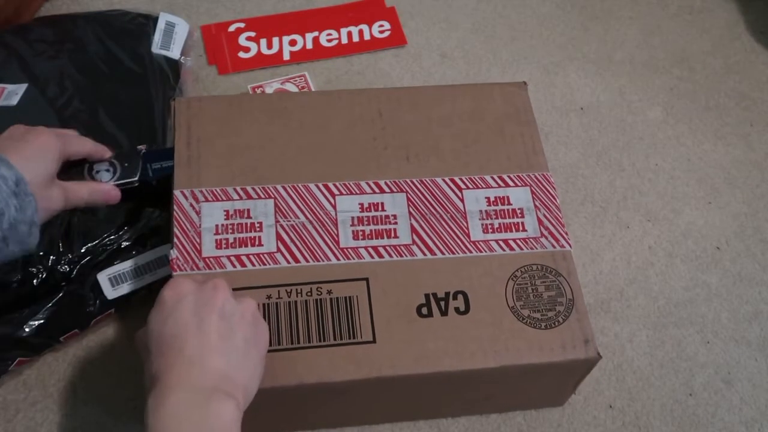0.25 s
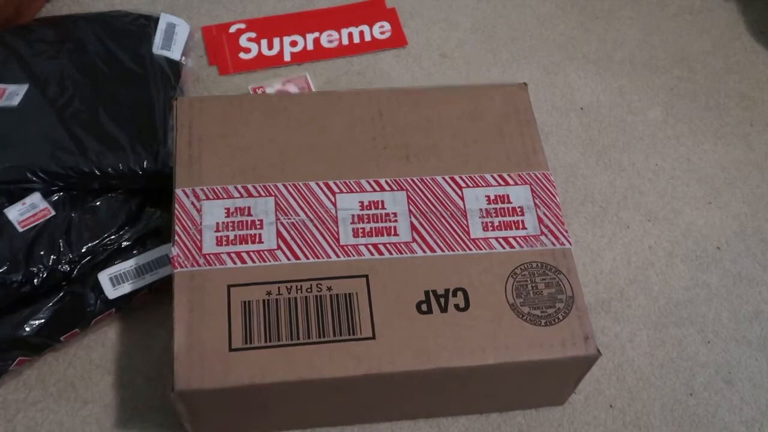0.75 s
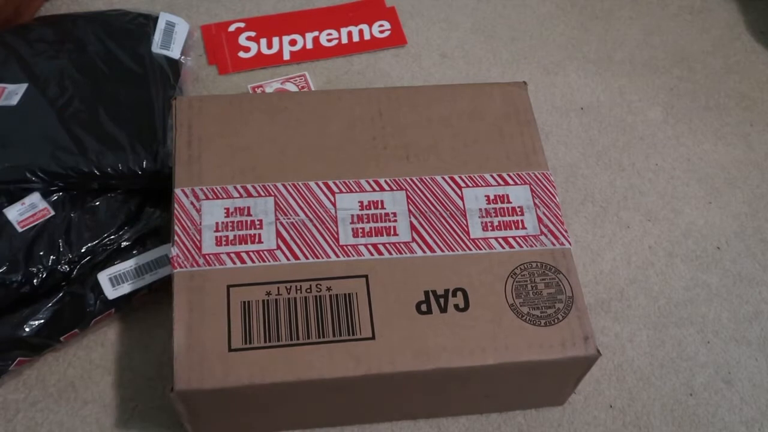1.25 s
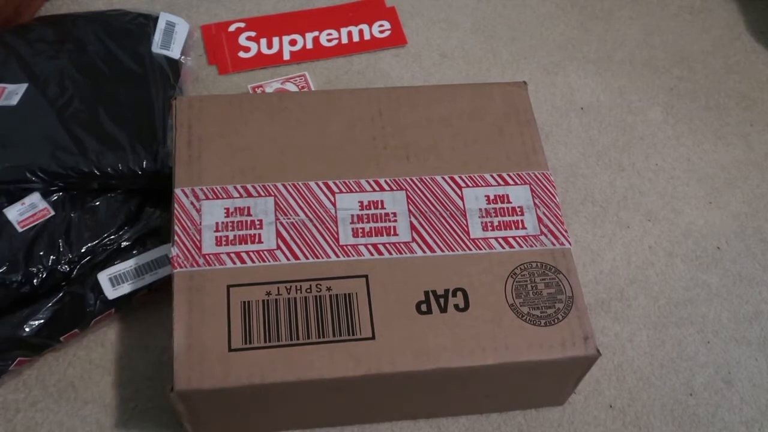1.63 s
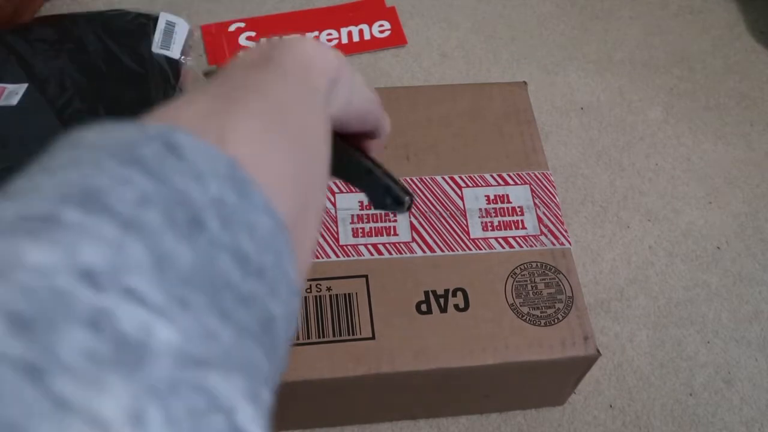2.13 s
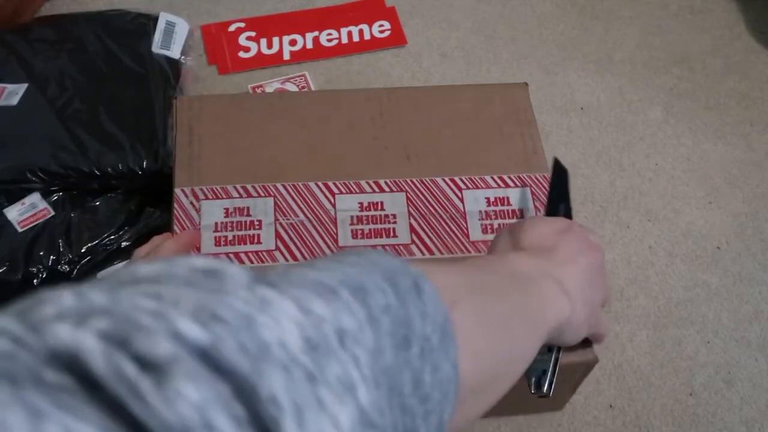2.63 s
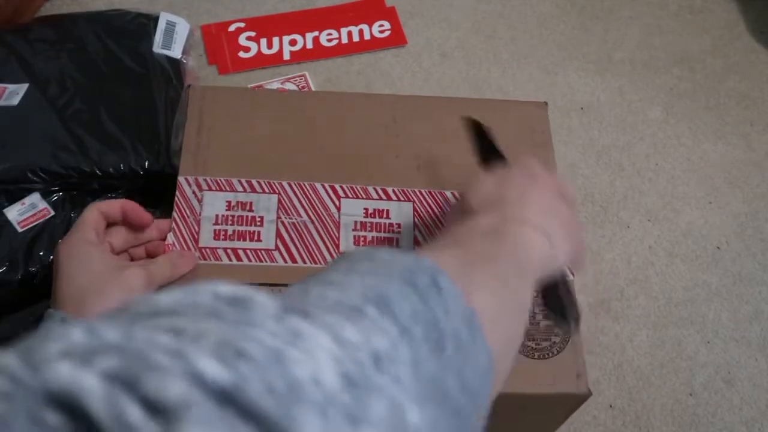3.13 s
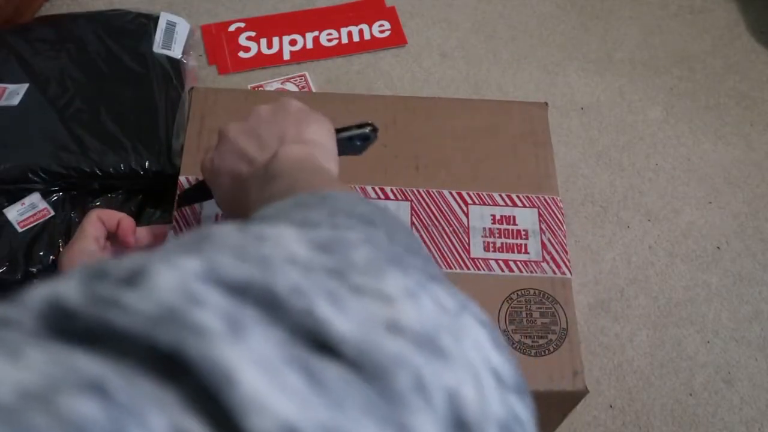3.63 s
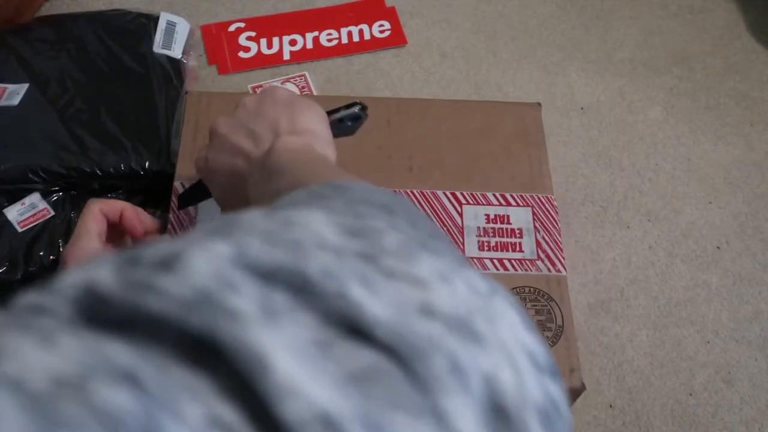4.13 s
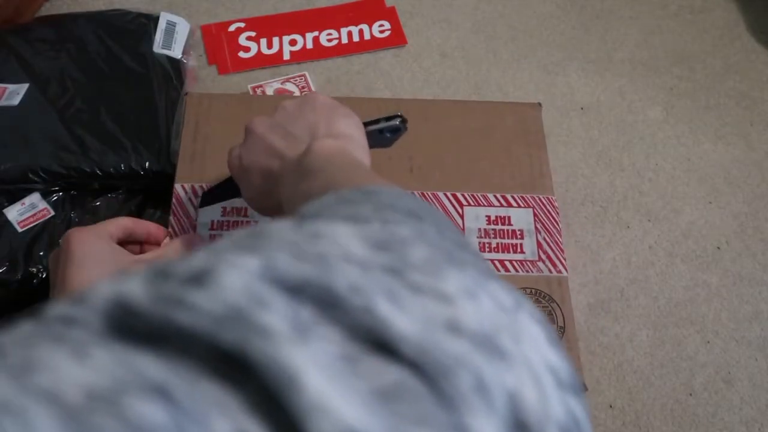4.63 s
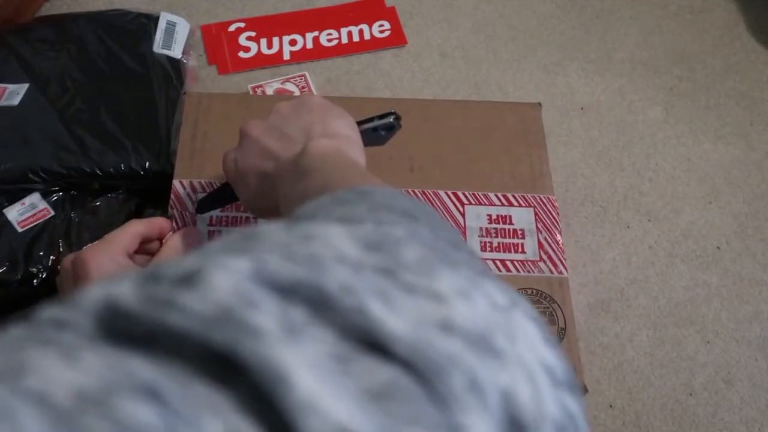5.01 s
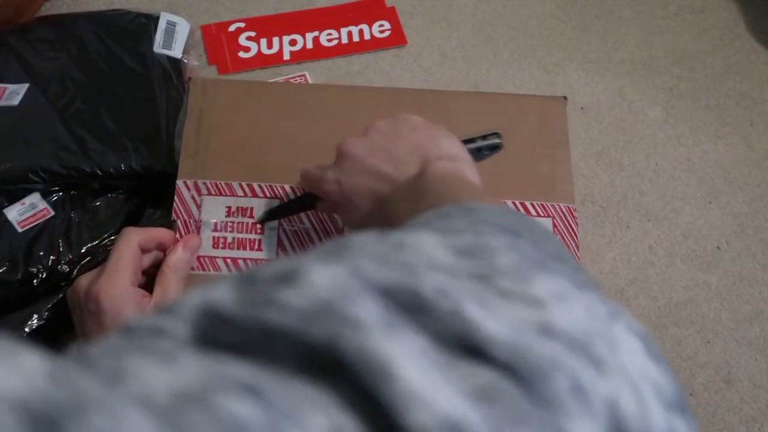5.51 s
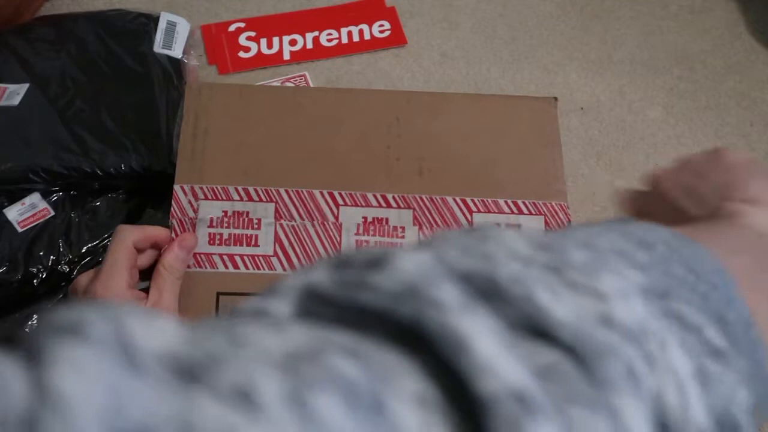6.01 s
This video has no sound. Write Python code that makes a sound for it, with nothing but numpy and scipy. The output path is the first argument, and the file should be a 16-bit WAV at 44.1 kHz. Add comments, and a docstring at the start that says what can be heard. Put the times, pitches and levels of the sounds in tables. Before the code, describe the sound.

A quiet small room with faint low rumble and light microphone hiss, heard close up. From 0 to 0.6 s a hand hisses softly over cardboard, with tiny dry scrapes and a light knock. At about 0.77 s the box drops back on carpet with a dull, crunchy low thud. Near silence follows, with faint ticks at 1.5 and 1.6 s. Around 1.9 s a sleeve swishes; at 2.3 s a knife point taps the lid. Cloth rubs and card scrapes softly from 2.4 to 3.1 s, with a brighter scrape near 2.9 s, then small pushes. At 3.93 to 4.15 s the blade punctures the tape with sharp hollow knocks and crackle. Quieter knocks and low dragging continue until 5.3 s, then crackling, ripping strokes grow over the hollow box, ending in a hard tearing snap at 6.04 s, then quiet.

```python
"""A hand hisses over a cardboard box on a carpet, over the faint rumble of a small room, close to a camera.
The hand lets the box drop back with a thud. A knife is picked up, its point taps the lid, it punctures the
packing tape and is drawn along the seam in crackling strokes until it snaps out at the far edge.
Touches ring the hollow box as fading sine tones with bursts of noise; sliding, scraping, cutting and cloth
weave are filtered showers of tiny random slips; air, swishes and lid rubbing are filtered noise."""
import sys
import numpy as np
from scipy import signal
from scipy.fft import rfft, irfft, next_fast_len
from scipy.io import wavfile
from scipy.ndimage import uniform_filter1d, map_coordinates

SR = 44100
rng = np.random.default_rng(int(sys.argv[2]) if len(sys.argv) > 2 else 0)


def int16_out(signal):
    """Quantize to a 16-bit WAV file."""
    q = np.round(np.clip(np.atleast_2d(signal).T, -1, 1) * 32767)
    wavfile.write(sys.argv[1], SR, q.astype(np.int16))


N = 275933  # length of the scene [samples]


def amp(db):
    """Turn decibels into a plain gain."""
    return 10 ** (np.asarray(db) / 20)


def unit(x):
    """Scale a sound to an average (rms) level of 1."""
    return x / np.sqrt(np.mean(x ** 2) + 1e-20)


def along(points, hz):
    """Read values between (frequency [Hz], value) points, on a log frequency axis."""
    point_hz, value = np.transpose(points)
    return np.interp(np.log(hz + 1), np.log(point_hz + 1), value)


def wobble(rate):
    """A smooth random curve through `rate` random points a second."""
    points = rng.standard_normal(int(N * rate / SR) + 4)
    return map_coordinates(points, [np.arange(N) * rate / SR])


def coloured(x, spectrum):
    """Filter a sound to a (frequency [Hz], level [dB]) shape, with no sound ahead of its cause."""
    n = x.shape[-1]
    m = 2 * next_fast_len(n // 2 + 4096)
    log_gain = np.log(amp(along(spectrum, np.fft.rfftfreq(m, 1 / SR))))
    # folding the cepstrum onto positive times gives the minimum-phase filter
    cepstrum = irfft(log_gain)
    cepstrum[1:m // 2] *= 2
    cepstrum[m // 2 + 1:] = 0
    response = np.exp(rfft(cepstrum))
    return irfft(rfft(x, m) * response, m)[..., :n]


def noise(spectrum):
    """Steady noise of the given colour, at rms 1."""
    return unit(coloured(rng.standard_normal(N), spectrum))


def slips(rate, spread_db):
    """Surfaces stick and let go: about `rate` tiny clicks a second, at random times and of uneven size."""
    size = amp(spread_db * np.clip(rng.standard_normal(N), -2, 2))
    happens = rng.random(N) < rate / SR
    return unit(happens * size * rng.choice([-1, 1], N))


def ring(modes, t, scatter_db, pitch=1):
    """Fading sine tones, all pushed the same way, a little different in level and pitch at each touch."""
    hz, db, t60 = np.transpose(modes)[:, :, None]
    strength, detune = rng.standard_normal((2, len(modes), 1))
    fading = amp(db + scatter_db * strength - 60 * t / t60)
    tone = np.sin(2 * np.pi * pitch * hz * (1 + 0.0082 * detune) * t)
    return np.sum(fading * tone, 0)


def crest(x, size=220):
    """Scale a blow so that its loudest 5 milliseconds have rms 1."""
    return x / np.sqrt(uniform_filter1d(x ** 2, size, mode="constant").max())


def crack(spectrum, t, t60, contact):
    """A burst of snapping fibres that builds up over the contact time [s], then dies away."""
    swell = (1 - np.exp(-t / contact)) ** 2 * amp(-60 * t / (t60 + 6 * contact))
    snaps = rng.standard_normal(len(t)) ** 3  # cubing gives a few large among many small
    return crest(coloured(snaps * swell, spectrum))


def gesture(rows, attack, release_db_per_s):
    """Gain for each level column: every stroke sets in, swells or fades while it lasts, then dies away."""
    t, total = np.arange(N) / SR, 0
    for start, length, swell_db, *level_db in rows:
        onset = np.sin(np.pi / 2 * np.clip((t - start) / attack, 0, 1)) ** 2
        held_db = swell_db * (np.clip((t - start) / length, 0, 1) - .5)
        let_go_db = release_db_per_s * np.maximum(t - start - length, 0)
        stroke = amp(level_db)[:, None] * onset * amp(held_db - let_go_db)
        total = np.maximum(total, stroke)  # where strokes overlap, the stronger one counts
    return total


def add(out, s, sound):
    """Mix a sound in at time s [s]."""
    out[round(s * SR):][:len(sound)] += sound


# how the low rumble of the room rises and falls: (time [s], relative level [dB])
RUMBLE_LEVEL = [(0, -52.5), (1.7, -49), (2.4, -41.5), (3.3, -40), (3.9, -41), (4.8, -46.5), (5.8, -43.5),
                (6.05, -42.5), (6.26, -53.5)]
# colour of that rumble, and of steady, dull room noise: (frequency [Hz], level [dB])
RUMBLE_COLOUR = [(20, -16), (45, -27), (60, -15), (78, 0), (112, 2.5), (140, -10.5), (200, -12.5),
                 (300, -65)]
ROOM_NOISE_COLOUR = [(15, -5), (45, 1), (65, 9.5), (110, -2), (250, -10.5), (300, -6), (340, -1.5),
                     (380, -20.5), (500, -29), (1000, -79)]
# colour of the microphone hiss, and of the low noise at each port: (frequency [Hz], level [dB])
HISS_COLOUR = [(60, -38), (150, -28), (330, -9), (500, -16.5), (1000, -11), (2000, -14), (4400, -20),
               (7300, -25), (12500, -31.5), (13800, -32), (15500, -84)]
PORT_NOISE_COLOUR = [(100, -22), (220, -1.5), (380, 0), (600, -5), (1200, -14), (3000, -61)]


def background():
    """Low room rumble over steady, dull room noise; each microphone adds its own hiss and low noise."""
    t = np.arange(N) / SR
    rumble = amp(np.interp(t, *np.transpose(RUMBLE_LEVEL)) + 1.0) * noise(RUMBLE_COLOUR)
    still = amp(-49.0) * noise(ROOM_NOISE_COLOUR)
    hiss = amp(-57) * np.array([noise(HISS_COLOUR), noise(HISS_COLOUR)])
    ports = amp(-56.0) * np.array([noise(PORT_NOISE_COLOUR), noise(PORT_NOISE_COLOUR)])
    return rumble + still + hiss + ports


# how long the reflections take to die away by 60 dB: (frequency [Hz], time [s])
ECHO_TIME = [(120, 0.31), (500, 0.16), (2000, 0.13), (6000, 0.16), (14000, 0.11)]
# how strong the reflections are: (frequency [Hz], level [dB])
ECHO_LEVEL = [(150, -18.5), (500, -10), (1500, -6.5), (6000, -2)]


def room_tail():
    """The walls' answer to a click: a burst of noise in which each frequency dies at its own speed."""
    hz, t, z = signal.stft(rng.standard_normal(SR // 3), SR, nperseg=256)
    t60 = along(ECHO_TIME, hz)[:, None]
    fading = amp(along(ECHO_LEVEL, hz)[:, None] - 60 * t / t60)
    even_energy = np.sqrt(2 * np.log(1000) / (t60 * SR))  # a longer tail is not a louder one
    tail = signal.istft(z * fading * even_energy, SR, nperseg=256)[1]
    return np.pad(tail, (round(.003 * SR), 0))  # the first reflection comes 3 ms late


def room(x, count=32):
    """Room reflections: evenly spaced random tails fade slowly into one another."""
    knots = np.linspace(0, N, count)
    out = np.zeros(N)
    for share in np.eye(count):
        fade = np.sqrt(np.interp(np.arange(N), knots, share))
        out += signal.oaconvolve(x * fade, room_tail())[:N]
    return out


# the sleeve swishes as the arm swings across:
# (start [s], length [s], swell [dB], level [dB], centre frequency [Hz])
ARM_SWINGS = [(1.91, 0.25, -8, -57.5, 1480), (3.147, 0.2, -2, -60, 2100)]
SLEEVE_RELEASE_DB_PER_S = 192


def swishes():
    """Cloth slides over cloth in a soft band of noise, higher for a quicker swing."""
    out = np.zeros(N)
    for *stroke, hz in ARM_SWINGS:
        swing, = gesture([stroke], attack=0.06, release_db_per_s=SLEEVE_RELEASE_DB_PER_S)
        out += swing * noise([(hz / 8, -50), (hz * 0.68, -9), (hz, 0), (hz * 1.56, -24), (hz * 4, -50)])
    return out


# the hand slides over the card: (start [s], length [s], swell [dB], relative level [dB])
HAND_SLIDES = [(-.05, 0.15, 5, -51.5), (.245, 0.096, 8, -47.5), (.29, 0.16, -0.5, -45.5),
               (.495, 0.068, -6, -47)]
# the sleeve brushes the lid as the arm reaches over:
# (start [s], length [s], swell [dB], relative rub level [dB], relative swish level [dB])
SLEEVE_BRUSHES = [(2.0, 2.1, -4.5, -57, -73), (2.41, 0.057, 8.5, -51, -63), (2.58, 0.23, -3, -53, -59.5),
                  (2.84, 0.18, -4.5, -46, -57), (3.05, 0.079, -1, -56, -54)]
# colours of skin on card, of cloth, and of anything dragged over the box: (frequency [Hz], level [dB])
SKIN_COLOUR = [(60, -17), (120, 2.5), (220, 0), (280, -7.5), (460, -7), (560, -15), (1000, -18),
               (1300, -18), (2200, -20), (5900, -23.5), (6550, -18), (7500, -19), (8500, -24.5),
               (14000, -34), (15500, -56)]
CLOTH_COLOUR = [(410, -23.5), (700, 4), (916, -1.5), (1850, -2.5), (2590, -4), (3430, -7), (11900, -17.5),
                (15000, -49)]
DRAG_COLOUR = [(40, -27.5), (100, -6), (165, 7), (215, -2), (290, -15), (405, -5), (440, -7), (490, -2.5),
               (600, -14), (750, -19), (1100, -25), (2500, -57.5)]


def handling():
    """Skin hisses over the card in tiny slips; later the sleeve's weave slips and its rub adds low noise."""
    slide, = gesture(HAND_SLIDES, attack=0.039, release_db_per_s=360)
    rub, swish = gesture(SLEEVE_BRUSHES, attack=0.0082, release_db_per_s=SLEEVE_RELEASE_DB_PER_S)
    flutter = amp(1.2 * wobble(130))
    skin = unit(coloured(slips(rate=1700, spread_db=1.0), SKIN_COLOUR))
    hand = amp(4.5) * flutter * slide * skin
    weave = unit(coloured(slips(rate=1100, spread_db=2.5), CLOTH_COLOUR))
    cloth = amp(2.5) * swish * weave
    rubbing = amp(3.0) * rub * noise(DRAG_COLOUR)
    folds = amp(1.8 * wobble(26))
    return hand + folds * (cloth + rubbing)


# short scrapes over the card: (start [s], length [s], swell [dB],
# judder of the panel [dB], chatter of the card [dB], scratch of its surface [dB])
SHORT_SCRAPES = [(0, 0.011, -12, -55, -47, -51), (0.1, 0.012, -1, -56, -48.5, -66),
                 (0.572, 0.013, -24, -35, -45, -43.5), (2.595, 0.035, 3, -66, -55, -63),
                 (2.70, 0.074, 8, -70, -54, -58.5), (2.882, 0.014, -7, -48, -38.5, -43.5),
                 (3.079, 0.014, 0.5, -32.5, -46, -44), (4.365, 0.028, 3.5, -50.5, -52.5, -65),
                 (4.78, 0.0097, -12, -51, -54, -54), (5.115, 0.028, 0, -46, -56.5, -63),
                 (6.015, 0.054, -3.5, -24.5, -39, -49)]
# colours of these three parts: (frequency [Hz], level [dB])
JUDDER_COLOUR = [(150, -12), (320, -28), (430, -7.5), (500, 4), (570, -11), (750, -22), (1500, -52)]
CHATTER_COLOUR = [(500, -33), (780, -5.5), (1100, -1.5), (1500, -2.5), (2000, -14), (2600, -7.5),
                  (4000, -16), (8000, -40.5)]
SCRATCH_COLOUR = [(1500, -34), (3000, 3), (5500, 1), (6900, 0.5), (8000, -12.5), (12500, -10), (15500, -35)]


def scrapes():
    """A short scrape catches and lets go: the panel judders, the card chatters, its surface scratches."""
    judder, chatter, scratch = gesture(SHORT_SCRAPES, attack=0.0042, release_db_per_s=602)
    catches = slips(rate=520, spread_db=0.5)
    grit = slips(rate=2300, spread_db=18.0)
    panel = judder * unit(coloured(catches, JUDDER_COLOUR))
    card = chatter * unit(coloured(catches, CHATTER_COLOUR))
    surface = scratch * unit(coloured(catches + grit, SCRATCH_COLOUR))
    return panel + card + surface


# the bottom edge meets the floor: (start [s], length [s], swell [dB], level [dB])
EDGE_LANDING = [(0.768, 0.0093, 13, -25.5)]
# colour of the crunching edge: (frequency [Hz], level [dB])
CRUNCH_COLOUR = [(100, -2), (250, 2.5), (420, -7), (555, 6), (700, -10), (872, 1), (1150, -32), (1560, -10),
                 (1800, -15), (2150, -9.5), (2700, -24), (3100, -36), (3500, -28), (6000, -34),
                 (12000, -66)]


def landing():
    """The box's bottom edge crunches down in many small slips, harder as its weight arrives."""
    weight, = gesture(EDGE_LANDING, attack=0.0029, release_db_per_s=758)
    return weight * unit(coloured(slips(rate=1400, spread_db=1.5), CRUNCH_COLOUR))


def jolt(start=0.776):
    """The box drops back, thuds on the floor and shakes the camera, with opposite sign at its two ports."""
    t = np.maximum(np.arange(N) / SR - start, 0)
    press = 1 - np.exp(-t / 0.0012)
    floor_modes = [(55, -6, 0.1), (96, 4, 0.13)]  # (frequency [Hz], level [dB], time to fade by 60 dB [s])
    thud = amp(-21) * crest(ring(floor_modes, t, scatter_db=2) * press)
    shaking = noise([(40, -30), (110, -3), (220, -2), (500, -9), (1000, -17), (3000, -34)])
    shake = amp(-22.5) * shaking * press * amp(-60 * t / 0.079)
    return np.array([thud + shake, thud - shake])


# colours of the knife's handle, and of its point on the lid: (frequency [Hz], level [dB])
HANDLE_COLOUR = [(400, -10), (1000, -10), (1750, -8), (2020, -1), (2480, -1), (2650, -22), (4800, -27),
                 (7000, -50)]
POINT_COLOUR = [(300, -8), (700, 9), (1100, -12), (1620, -2), (1880, -4), (2500, -19), (3100, -8),
                (3700, -28), (7000, -39)]


def knife():
    """The handle clacks softly as it is picked up; later the point is set down on the lid."""
    out, t = np.zeros(N), np.arange(SR // 4) / SR
    add(out, 1.589, amp(-43) * crack(HANDLE_COLOUR, t, t60=0.025, contact=0.001))
    add(out, 2.297, amp(-34) * crack(POINT_COLOUR, t, t60=0.017, contact=0.002))
    return out


# tones of the stiff card: (frequency [Hz], level [dB])
CARD_TONES = [(720, -1.5), (890, -8), (1120, -3.5), (1290, 1), (1430, 4), (1760, -3), (2200, 1.5),
              (2750, 7.5), (3050, 4), (3600, 2), (4040, 7), (4800, 1)]


def card_ring(t, scatter_db):
    """Card is lossy: each of its tones fades by 60 dB within the same 34 cycles."""
    return ring([(hz, db, 34 / hz) for hz, db in CARD_TONES], t, scatter_db)


# tones of the lid: (frequency [Hz], level [dB], time to fade by 60 dB [s])
LID_TONES = [(94, -10.5, 0.11), (132.3, 0.5, 0.083), (154.8, 3, 0.069), (193, -3.5, 0.087),
             (218, -34, 0.021)]
# tones of the panels: (multiple of the knock pitch [ratio], level [dB], time to fade by 60 dB [s])
PANEL_TONES = [(.82, -3.5, 0.13), (1, 12, 0.048), (1.14, -2.5, 0.061), (1.4, -12.5, 0.019),
               (1.76, -15, 0.035)]
# colours of clacking card and ticking tape: (frequency [Hz], level [dB])
CLACK_COLOUR = [(300, -44.5), (800, 2), (2200, -14.5), (4000, -9.5), (6000, -16.5), (12000, -52)]
TICK_COLOUR = [(1000, -22.5), (3500, -0.5), (5500, 4.5), (8000, 1.5), (12500, -4), (14500, -17),
               (16000, -16)]


def blow(mix_db, knock_hz, clack_hz, contact, treble_db=-14):
    """One touch pushes the lid, knocks the panels, clacks the stiff card and ticks the tape."""
    t = np.arange(SR // 4) / SR
    press = 1 - np.exp(-t / contact)
    thump = crest(ring(LID_TONES, t, scatter_db=3.0) * press)
    panels = ring(PANEL_TONES, t, scatter_db=3.0, pitch=knock_hz) * press
    knock = crest(np.gradient(panels))  # the slope favours the higher tones
    fibres = crack(CLACK_COLOUR, t, t60=0.011, contact=contact)
    card = fibres + amp(-7.0) * crest(card_ring(t, scatter_db=5) * press ** 2)
    clack = crest(coloured(card, [(clack_hz / 3, -13), (clack_hz, 0), (clack_hz * 3, treble_db)]))
    tick = crack(TICK_COLOUR, t, t60=0.0046, contact=contact)
    return amp(mix_db) @ np.array([thump, knock, clack, tick])


# soft pushes, under which the lid gives way:
# (time [s], relative level [dB], brightness [dB], panel pitch [Hz], clack pitch [Hz])
SOFT_PUSHES = [(0.785, -15.5, -7, 311, 1230), (2.279, -37.5, 13, 600, 1000), (2.301, -23.5, -5, 474, 1650),
               (2.601, -33, 7, 387, 1240), (3.603, -26, 2.5, 500, 1270), (3.738, -37.5, 9, 773, 1240),
               (4.002, -11.5, 2, 342, 950), (4.044, -15, 1, 390, 900), (4.066, -24, -2, 486, 1000),
               (4.176, -30, 3, 574, 1000), (4.382, -15.5, 2.5, 344, 1080), (4.53, -33, 4, 513, 900),
               (4.882, -35, 9, 470, 1170), (5.336, -25, -14, 445, 1000), (5.545, -29.5, 0, 456, 1010),
               (5.58, -25.5, 12, 514, 1730), (5.667, -13.5, -2, 437, 1500), (5.68, -11.5, -4, 405, 1500),
               (5.7, -25, -6, 510, 1240), (5.794, -19, 6, 435, 1100), (5.887, -15, 1, 434, 1110)]
# firm knocks of hand and knife:
# (time [s], relative level [dB], brightness [dB], panel pitch [Hz], contact time [s])
FIRM_KNOCKS = [(.516, -39.5, -5, 468, 0.0028), (.57, -31.5, -0.5, 472, 0.0016),
               (.767, -44, 13, 645, 0.00051), (.777, -26.5, -0.5, 520, 0.0014),
               (2.888, -32, 4, 466, 0.0037), (2.968, -39, -5, 464, 0.0012), (3.079, -26, -7.5, 506, 0.008),
               (3.928, -12, -6, 513, 0.00085), (3.984, -20, -0.5, 702, 0.0043),
               (4.038, -10.5, -0.5, 528, 0.00085), (4.294, -45, -1, 617, 0.00071),
               (4.487, -30.5, -8, 498, 0.002), (4.575, -18.5, -5, 499, 0.0032)]
# shares of a push and of a knock: (lid thump [dB], panel knock [dB], card clack [dB], tape tick [dB])
PUSH_SHARES = (0, -10.5, -23, -51)
KNOCK_SHARES = (-2.5, -0.5, -7, -18.5)
# the taut tape snaps and jerks the card and the lid: (time [s], tape [dB], card [dB], lid [dB])
TAPE_SNAPS = [(1.486, -53.5, -59, -40.5), (2.757, -49.5, -43, -37), (3.067, -46, -40, -55),
              (3.925, -26.5, -32, -39), (3.935, -26, -22.5, -23), (4.15, -51.5, -60, -57),
              (4.485, -47, -61, -45), (4.867, -55.5, -81, -44), (5.307, -40, -33, -36),
              (5.352, -35.5, -40, -54), (5.453, -55, -55, -54), (5.596, -37.5, -41, -30),
              (5.669, -54, -32, -18), (5.704, -41, -40, -40), (5.763, -42, -45, -48),
              (5.834, -30, -27, -35), (5.855, -44, -48, -43), (5.975, -38, -30.5, -39),
              (6.005, -35, -49, -48), (6.038, -26, -15, -39)]


def blows():
    """Pushes, knocks and snaps ring the same box in different shares; brightness lifts clack and tick."""
    out, treble = np.zeros(N + SR), np.array([0, 0, 1, 1])
    for s, db, bright_db, hz, clack_hz in SOFT_PUSHES:
        mix_db = db + np.array(PUSH_SHARES) + bright_db * treble
        contact = 0.0021 * amp(-bright_db / 2)  # a duller push has a softer, longer contact
        # a soft touch leaves the upper card tones still
        add(out, s, blow(mix_db, hz, clack_hz, contact, treble_db=-33))
    for s, db, bright_db, hz, contact in FIRM_KNOCKS:
        mix_db = db + np.array(KNOCK_SHARES) + bright_db * treble
        add(out, s, blow(mix_db, hz, clack_hz=1670, contact=contact))
    for s, tape_db, card_db, lid_db in TAPE_SNAPS:
        mix_db = [lid_db, card_db - 1, card_db, tape_db]  # the panels knock just below the card
        add(out, s, blow(mix_db, knock_hz=496, clack_hz=2520, contact=0.0019))
    return coloured(out[:N], [(30, -39), (70, -10.0), (125, -1.0)])  # the blows carry little deep bass below 70 Hz


# strokes of the blade: (start [s], length [s], swell over the stroke [dB], drag on the box [dB],
# relative rasp of the tape [dB], relative tearing of the card [dB])
BLADE_STROKES = [(3.93, 0.11, -15, -29, -38.5, -36), (4.045, 0.026, -1, -29.5, -42, -36),
                 (4.115, 0.06, -3, -41, -48, -46), (4.5, 0.77, -8, -50, -60, -67),
                 (4.97, 0.15, 2.5, -37.5, -59.5, -63), (5.17, 0.16, 17, -41, -56.5, -64),
                 (5.295, 0.071, 0.5, -33, -47.5, -48), (5.515, 0.066, 13, -42, -51, -51.5),
                 (5.582, 0.052, 4.5, -30.5, -38.5, -43), (5.667, 0.14, -5.5, -27, -40.5, -41.5),
                 (5.836, 0.061, 2, -37.5, -46, -45), (5.915, 0.11, 11.5, -25.5, -43, -38),
                 (6.0, 0.037, 15, -26.5, -29, -38), (6.038, 0.026, -14, -33, -28, -21)]
# colour of the splitting tape: (frequency [Hz], level [dB])
RASP_COLOUR = [(300, -21), (900, 12), (1350, 18), (1680, 12), (2250, 10), (2750, 8.5), (3200, 8), (4000, 3),
               (4500, 0.5), (8000, -2.5), (12500, -10), (14500, -37), (16000, -65)]


def cutting():
    """The blade catches and slips: coarse slips shake the box, the film crackles, fibres tear in clumps."""
    drag, rasp, tear = gesture(BLADE_STROKES, attack=0.0026, release_db_per_s=353)
    coarse = slips(rate=900, spread_db=1.5)
    clumps = amp(3 * wobble(140))
    fibres = unit(slips(rate=1600, spread_db=4) * clumps)
    splitting = unit(coloured(fibres + 1.17 * coarse, RASP_COLOUR))
    crackles = slips(rate=260, spread_db=3)
    film = amp(-6) * unit(coloured(crackles, TICK_COLOUR))
    card = card_ring(np.arange(SR // 8) / SR, scatter_db=0)
    tearing = unit(signal.fftconvolve(fibres + crackles, card)[:N])  # each of these slips rings the card
    catch = unit(amp(2.2 * wobble(190)))
    shaken_box = drag * unit(coloured(coarse, DRAG_COLOUR))
    return shaken_box + amp(-4.0) * catch * (rasp * (splitting + film) + tear * tearing)


# how far the two ports differ: (frequency [Hz], level [dB])
STEREO_WIDTH = [(100, -64), (500, -47), (1200, -36), (2500, -17), (4200, -8.5), (6000, -4.5), (9000, -1.5),
                (14000, 4.5)]


def scene():
    """Two close microphone ports hear nearly the same bass but different treble reflections."""
    box = swishes() + handling() + scrapes() + landing() + knife() + blows() + cutting()
    mid = box + room(box)
    side = coloured(amp(4.0) * room(box), STEREO_WIDTH)
    # the direct treble reaches one port a moment earlier
    slant = 0.035 * np.gradient(coloured(box, STEREO_WIDTH))
    return background() + jolt() + np.array([mid + side + slant, mid - side - slant])


TOP_HZ = 15800


def record(dry):
    """The camera keeps nothing above its band limit."""
    m = next_fast_len(N + SR // 2)
    kept = np.fft.rfftfreq(m, 1 / SR) < TOP_HZ
    return irfft(rfft(dry, m) * kept, m)[..., :N]


dry = scene()
out = record(dry)
int16_out(out)
```